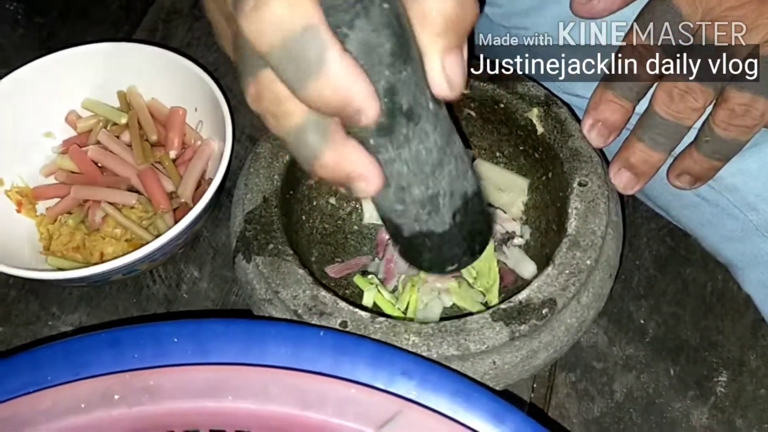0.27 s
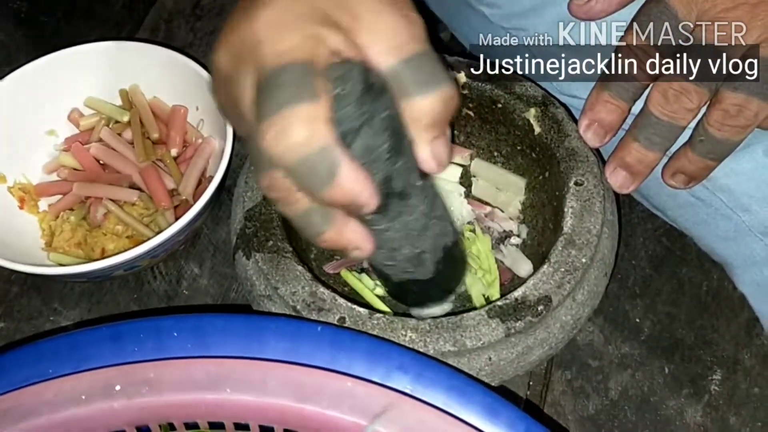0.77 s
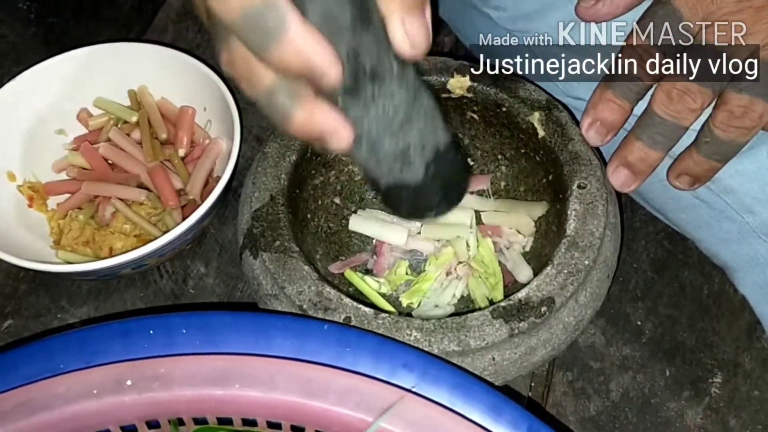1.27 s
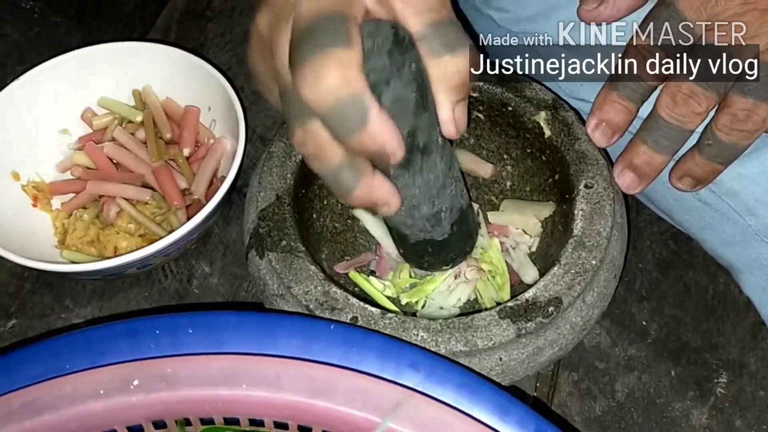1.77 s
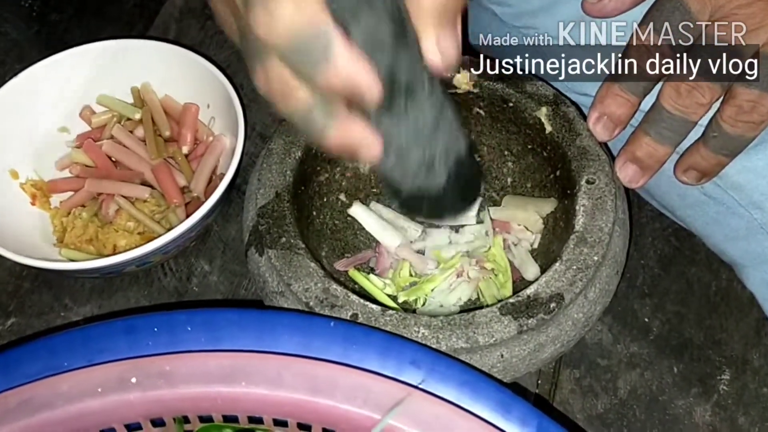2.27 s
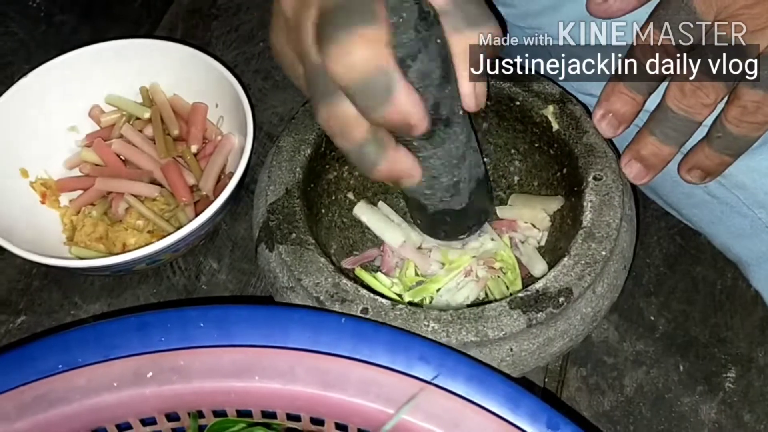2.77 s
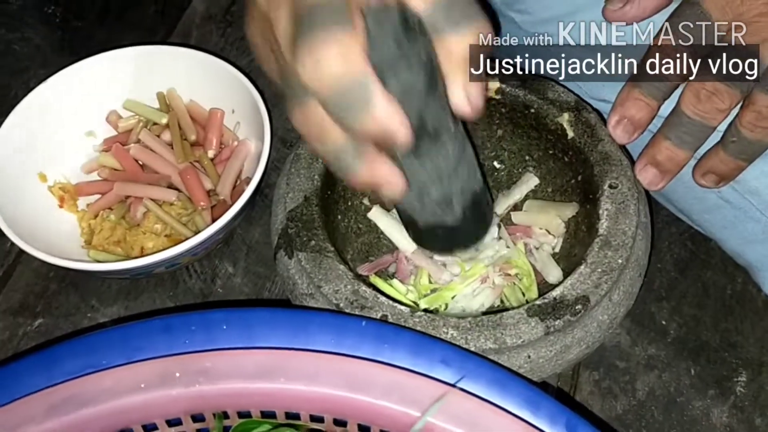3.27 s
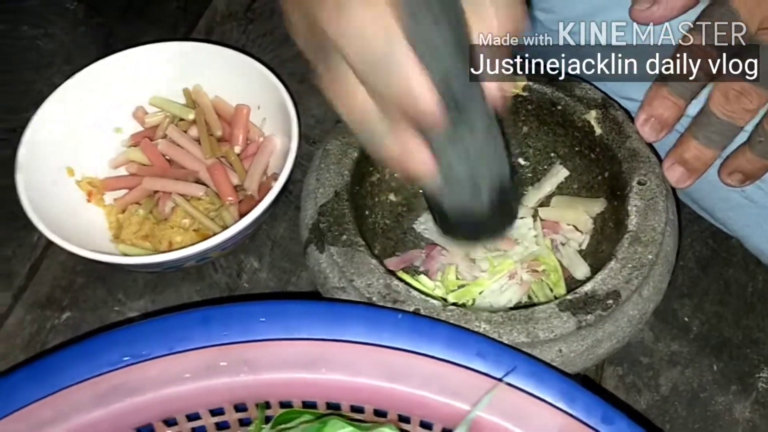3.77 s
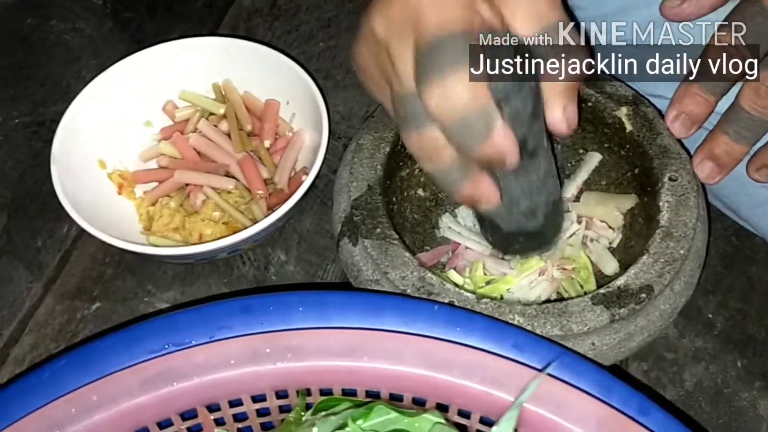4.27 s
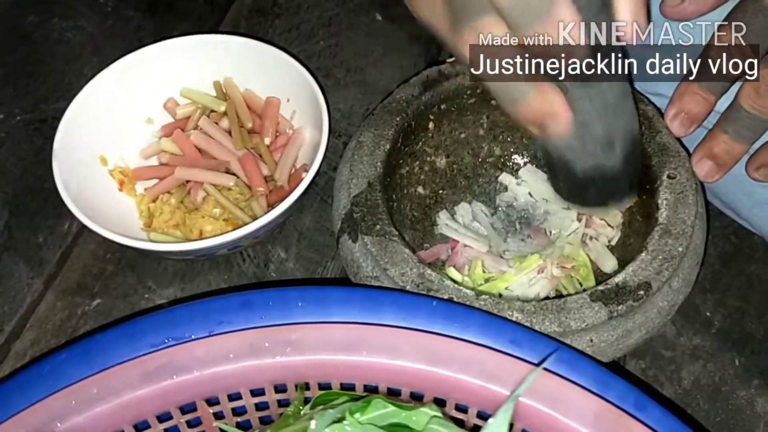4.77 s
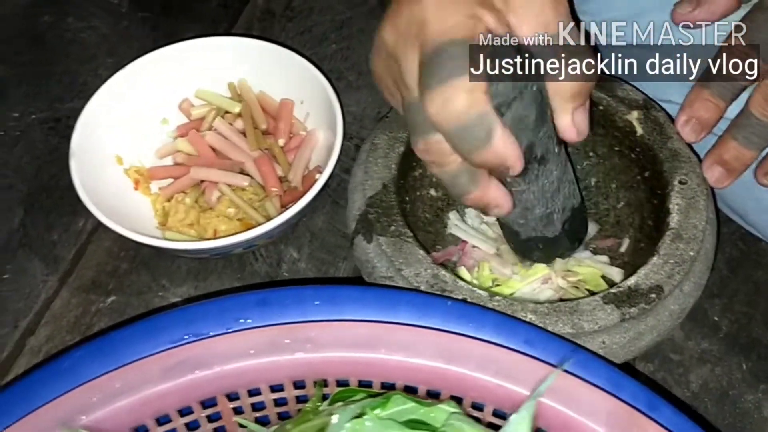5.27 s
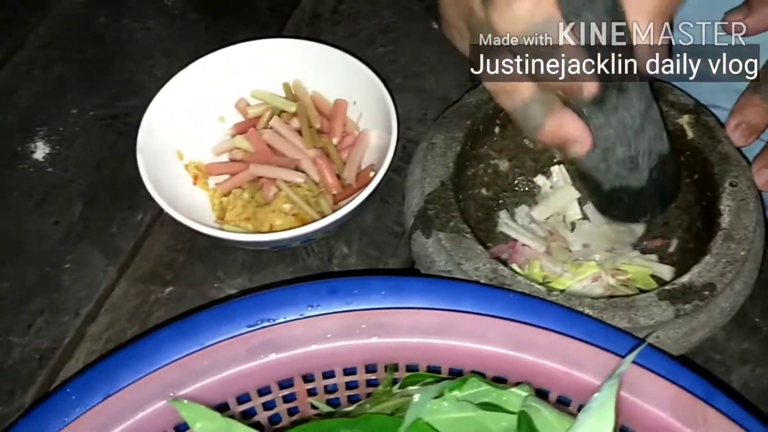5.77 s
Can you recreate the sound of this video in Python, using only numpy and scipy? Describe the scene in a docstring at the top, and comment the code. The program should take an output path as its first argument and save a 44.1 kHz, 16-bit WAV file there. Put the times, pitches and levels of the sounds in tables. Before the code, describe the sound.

Close, dry pounding in a small home kitchen: stone pestle on juicy stalks in a heavy mortar set on boards, steady and unhurried to the end. Crunchy bursts and low thuds vary in strength, with bright knocks where stone meets stone and two faint scrapes along the wall. Behind lies low room hiss with thin high insect trills. The microphone's automatic level pulls everything down briefly at most hits.

```python
"""Room hiss and faint insects, and at once a stone pestle pounding fresh stalks in a stone mortar.
About three blows a second: noise bursts crunch the stalks, damped board modes thump the wooden floor.
Some blows reach the stone and excite modes of bowl and pestle, a knock or a clink; small taps fall between.
Trills are narrow noise on a rising carrier; one faint tone swells late. The whole level dips around most blows."""
import sys
import numpy as np
from scipy import signal
from scipy.fft import rfft, irfft, next_fast_len
from scipy.io import wavfile
from scipy.ndimage import uniform_filter1d, map_coordinates

SR = 44100
rng = np.random.default_rng(int(sys.argv[2]) if len(sys.argv) > 2 else 0)


def bounce(signal):
    """Save signal as a 16-bit WAV file at the path given by the first command-line argument."""
    frames = np.transpose(np.atleast_2d(signal))
    limited = np.clip(frames, -1, 1)
    pcm = np.round(limited * 32767).astype(np.int16)
    wavfile.write(sys.argv[1], SR, pcm)


N = 265305

# background spectrum: (frequency [Hz], relative level [dB])
HISS_COLOUR = [(20, 3.5), (100, 1.5), (200, -7.5), (340, -13), (450, -11.5), (530, -5), (680, -8),
               (1000, -5), (2300, -7), (4200, -16), (6500, -22.5), (12000, -24.5), (15500, -20.5)]
# insect bands: (centre [Hz], half-width [Hz], level [dB])
CHORUS_BANDS = [(5276, 390, -61.5), (8220, 460, -62)]
# rising trills of the nearest insect: (start [s], end [s], level [dB])
INSECT_TRILLS = [(1.156, 1.642, -58.5), (3.909, 4.321, -60.5), (5.218, 5.851, -59)]
# pestle blows: (time [s], force [dB], crunch [dB], crunch brightness above 10 kHz [dB], whole-level dip [dB])
PESTLE_BLOWS = [(0.0533, -21, -18.5, 10.5, 5.5), (0.3828, -20.5, -22.5, 3, 3),
                (0.704, -25.5, -24, 7.5, 1.5), (1.0589, -25.5, -24.5, -10, 14.5),
                (1.4288, -25, -20, 5.5, 0), (1.769, -25, -10, 10, 8), (2.1047, -21, -16, 0.5, 11.5),
                (2.443, -24, -45, 10, 4), (2.8005, -24, -22.5, 4.5, 3), (3.137, -21, -20, -0.5, 5),
                (3.4778, -24, -21, 5, 1), (3.835, -22.5, -17, 1, 9), (4.1784, -19.5, -17, 1, 6),
                (4.5225, -20, -10, 1, 13.5), (4.844, -29.5, -32, -8, 0.5), (5.1989, -22, -22, 2, 3),
                (5.5353, -20, -21, 4.5, 0.5), (5.8674, -23, -16, 3, 7)]
# pestle scrapes down the mortar wall: (time [s], level [dB])
WALL_SCRAPES = [(2.463, -34.5), (4.8535, -30.5)]
# crushed-stalk spectrum: (frequency [Hz], relative level [dB])
CRUNCH_COLOUR = [(200, 17), (800, 5), (2500, 8), (5500, 3), (8000, 11), (10500, 3), (15000, 4.5),
                 (17000, 11)]
# floorboard modes: (frequency [Hz], relative level [dB], t60 [s])
BOARD_MODES = [(42, -1, 0.12), (68, 3, 0.054), (124.4, -1.5, 0.088), (185.9, -9.5, 0.19),
               (314.3, -14, 0.079), (391, -10.5, 0.1)]
# spectrum of the mortar landing on the boards: (frequency [Hz], relative level [dB])
CLUNK_COLOUR = [(40, -9), (150, 5.5), (300, 3), (500, 0.5), (850, -4.5), (1300, -10.5), (2000, -13),
                (4000, -77)]
# small taps of the hands between blows: (time [s], relative level [dB])
HAND_TAPS = [(0.325, -33), (3.079, -29.5), (3.386, -29.5), (3.721, -35), (5.735, -28), (5.971, -31)]
# tap spectrum: (frequency [Hz], relative level [dB])
TAP_COLOUR = [(100, -15), (550, 12.5), (1200, 3.5), (3000, -1.5), (8000, -20), (16000, -22)]
# pestle reaches the stone: (time [s], knock [dB], ring [dB], contact sharpness [Hz])
STONE_KNOCKS = [(0.3849, -10, -57, 670), (1.0577, 2.5, -7.5, 6200), (2.4426, -6, -14.5, 2700),
                (2.4535, -10.5, -39, 1730), (3.4803, -6.5, -42, 1040), (3.8364, 2, -60, 2230),
                (4.5223, 5, -41, 2400), (4.842, -12, -33.5, 1850), (5.5373, -11, -66, 750),
                (5.867, 0, -41, 2440)]
# modes of the mortar's hollow: (frequency [Hz], relative level [dB], t60 [s])
BOWL_MODES = [(299, -5.5, 0.016), (1007, 0, 0.0087), (1445, 3, 0.0059), (2230, 5, 0.0027),
              (3000, -10.5, 0.0084)]
# pestle modes: (frequency [Hz], relative level [dB], t60 [s])
PESTLE_MODES = [(1860, -25, 0.046), (2095, -7.5, 0.026), (2283, -14.5, 0.12), (3160, -17.5, 0.097),
                (3610, 1, 0.093), (3606, -13.5, 0.22), (3690, -7, 0.15), (3660, -15.5, 0.24),
                (4460, -31, 0.11), (8150, -25, .03), (9060, -20, 0.018)]
# faint background tone: (start [s], end [s], frequency [Hz], level [dB])
FAINT_TONE = (5, 5.5, 998, -61)
# spectrum of the walls' answer: (frequency [Hz], relative level [dB])
WALL_COLOUR = [(40, -11), (150, -5), (400, -5), (580, 2), (830, 3.5), (1300, -7), (2500, -7.5),
               (5000, -7.5), (15000, -13.5)]
# room decay: (frequency [Hz], t60 [s])
ROOM_DECAY = [(60, 0.46), (160, 0.32), (420, 0.15), (1100, 0.18), (3000, 0.17), (8000, 0.12), (15000, 0.2)]

TOP_HZ = 15750  # band limit
TRILL_FROM_HZ, TRILL_TO_HZ = 5490, 5630  # every trill rises alike
CRUSH_S, BREAK_S, SCRAPE_S = 0.0016, 0.00073, 0.0064  # half-lengths: cushioned, clean through, scrape
BARE_HZ = 1500  # sharper stone contacts have gone clean through the stalks
USUAL_FORCE_DB = -24  # reference force for push and hop
PUSH_S, PUSH_SHORTENS_DB_PER_DB = 0.0016, 0.63  # half-length of a usual push; shortening with force
SWAY_BUILD_S = 0.0029
FLIGHT_S, FLIGHT_GROWS_DB_PER_DB = 0.0175, 0.29  # mortar's hop after a usual blow; growth with force
REBOUND_DB, REBOUND_GROWS_DB_PER_DB = -23.5, 2.02  # relative landing level; growth with force
DIP_AHEAD_S, DIP_HOLD_S = 0.0087, 0.083  # dip starts before the blow, outlasts its main contact


def amp(db):
    """Amplitude factor of a level in dB."""
    return 10 ** (np.asarray(db) / 20)


def unit(x):
    """x at rms 1."""
    return x / np.sqrt(np.mean(x ** 2) + 1e-20)


def along(points, hz):
    """(Hz, value) points interpolated on a log-frequency axis."""
    f, v = np.transpose(points)
    return np.interp(np.log(hz + 1), np.log(f + 1), v)


def filtered(x, response):
    """x times a zero-phase response of frequency."""
    size = next_fast_len(len(x) + 8192)
    spectrum = rfft(x, size) * response(np.fft.rfftfreq(size, 1 / SR))
    return irfft(spectrum, size)[:len(x)]


def coloured(x, points):
    """x shaped by (Hz, dB) points."""
    return filtered(x, lambda hz: amp(along(points, hz)))


def pulse(points, size=2048):
    """Minimum-phase pulse with this spectrum, peak 1."""
    hz = np.fft.rfftfreq(size, 1 / SR)
    cepstrum = irfft(np.log(amp(along(points, hz))))
    # fold the cepstrum onto positive time: causal, energy earliest
    cepstrum[1:size // 2] *= 2
    cepstrum[size // 2 + 1:] = 0
    shape = irfft(np.exp(rfft(cepstrum)))
    return shape / np.abs(shape).max()


def wobble(rate_hz):
    """Smooth random curve, rate_hz knots a second."""
    knots = rng.standard_normal(int(N * rate_hz / SR) + 4)
    return map_coordinates(knots, [np.arange(N) * rate_hz / SR])


def add(track, start_s, sound):
    """Mix a sound into the track from start_s."""
    i = max(round(start_s * SR), 0)
    track[i:i + len(sound)] += sound[:max(len(track) - i, 0)]


def ring(modes, scatter_db, detune):
    """A third of a second of damped modes, level and pitch scattered at each call."""
    t = np.arange(SR // 3) / SR
    total = np.zeros(len(t))
    for hz, db, t60 in modes:
        envelope = amp(db + scatter_db * rng.normal() - 60 * t / t60)
        mode_hz = hz * (1 + detune * rng.normal())
        total += envelope * np.sin(2 * np.pi * mode_hz * t)
    return total


def in_room(sound, wet_db, gap_s=0.0029, build_s=0.002):
    """The sound plus the walls' answer: fresh decaying noise that builds up after a short gap."""
    hz, t, noise = signal.stft(rng.standard_normal(SR // 4), SR, nperseg=256)
    decay = amp(-60 * t / along(ROOM_DECAY, hz)[:, None])
    tail = signal.istft(noise * decay, SR, nperseg=256)[1]
    age = np.maximum(np.arange(len(tail)) / SR - gap_s, 0)
    tail = coloured(tail / np.linalg.norm(tail), WALL_COLOUR) * (1 - np.exp(-age / build_s))
    return sound + amp(wet_db) * signal.fftconvolve(sound, tail)[:len(sound)]


def hiss(level_db=-48.5, waver_db=-1.0):
    """Steady room background: coloured noise with a slight waver."""
    noise = unit(coloured(rng.standard_normal(N), HISS_COLOUR))
    return amp(level_db + waver_db * wobble(4.837)) * noise


def noise_band(centre_hz, width_hz):
    """Noise in a Gaussian band, rms 1."""
    noise = rng.standard_normal(N)
    return unit(filtered(noise, lambda hz: np.exp(-.5 * ((hz - centre_hz) / width_hz) ** 2)))


def insects(trill_width_hz=110):
    """Distant chorus in two wavering noise bands; a nearer insect's trills swell and rise."""
    t = np.arange(N) / SR
    out = np.zeros(N)
    for hz, width_hz, db in CHORUS_BANDS:
        out += amp(db + 0.83 * wobble(4.4)) * noise_band(hz, width_hz)
    for start, end, db in INSECT_TRILLS:
        progress = np.clip((t - start) / (end - start), 0, 1)
        pitch_hz = TRILL_FROM_HZ + (TRILL_TO_HZ - TRILL_FROM_HZ) * progress
        carrier = np.sin(2 * np.pi * np.cumsum(pitch_hz) / SR)
        trill = unit(carrier * noise_band(0, trill_width_hz))
        out += amp(db) * np.sin(np.pi * progress) * trill
    return out


def breaks_through(blow_s):
    """Whether the blow at blow_s ends in a sharp contact of bare stone."""
    return any(abs(at - blow_s) < .02 and sharp_hz > BARE_HZ for at, _, _, sharp_hz in STONE_KNOCKS)


def crushes(scrape_bright_db=1.0):
    """(s, half-length s, dB, brightness dB) of stalks giving way under blows and scrapes."""
    events = []
    for s, _, db, bright_db, _ in PESTLE_BLOWS:
        half_s = BREAK_S if breaks_through(s) else CRUSH_S
        events.append((s, half_s, db, bright_db))
    return events + [(s, SCRAPE_S, db, scrape_bright_db) for s, db in WALL_SCRAPES]


def crunch(lead_s=.03, touch_db=-14, touch_ahead_s=0.0049, squelch_db=-26, squelch_life_s=0.0072,
           grain_db=4, wet_db=3):
    """Plant cells burst in a dense crackle: first touch, the crush itself, wet squelch."""
    out = np.zeros(N)
    t = np.arange(SR // 4) / SR - lead_s
    for s, half_s, db, bright_db in crushes():
        crush = np.exp(-.5 * (t / half_s) ** 2)
        touch = amp(touch_db) * (t > -touch_ahead_s) * (t < 0)
        squelch = amp(squelch_db) * (t > 0) * np.exp(-np.abs(t) / squelch_life_s)
        # uneven grain levels make the noise crackle
        cells = rng.standard_normal(len(t)) * amp(grain_db * rng.standard_normal(len(t)))
        colour = [(hz, level + 0.5 * rng.normal() + bright_db * (hz > 10000))
                  for hz, level in CRUNCH_COLOUR]
        burst = unit(coloured(cells, colour)) * (crush + touch + squelch)
        add(out, s - lead_s, in_room(amp(db) * burst, wet_db))
    return out


def thump(push_db=1, push_lag_s=0.00099, sway_db=-1.5, wet_db=1):
    """The cushioned blow pushes the mortar down; the boards swing back and sway in damped modes."""
    lead_s = .01
    out = np.zeros(N)
    t = np.arange(SR // 3) / SR - lead_s
    for s, db, *_ in PESTLE_BLOWS:
        # a harder push is shorter
        half_s = PUSH_S * amp(-PUSH_SHORTENS_DB_PER_DB * (db - USUAL_FORCE_DB))
        body = -amp(push_db) * np.exp(-.5 * ((t - push_lag_s) / half_s) ** 2)
        build = 1 - np.exp(-(t + lead_s) / SWAY_BUILD_S)
        sway = amp(sway_db) * build * ring(BOARD_MODES, scatter_db=2.5, detune=0.028)
        add(body, lead_s + push_lag_s, sway)
        add(out, s - lead_s, in_room(amp(db) * body, wet_db))
    return out


def flight_s(force_db):
    """Seconds until the mortar lands again: a harder blow makes it hop longer."""
    return FLIGHT_S * amp(FLIGHT_GROWS_DB_PER_DB * (force_db - USUAL_FORCE_DB))


def rebounds():
    """(s, relative dB) of the mortar rocking back onto the boards after each blow."""
    return [(s + flight_s(force_db), REBOUND_DB + REBOUND_GROWS_DB_PER_DB * (force_db - USUAL_FORCE_DB))
            for s, force_db, *_ in PESTLE_BLOWS]


def dead_knocks(events, colour, gain_db, wet_db):
    """Short dead contacts, one coloured pulse each, that the room fills out."""
    out = np.zeros(N)
    shape = np.pad(pulse(colour), (0, SR // 5))
    for s, db in events:
        add(out, s, in_room(amp(db + gain_db) * shape, wet_db))
    return out


def stone(knock_wet_db=-1, ring_wet_db=-2):
    """Stone meets stone: paste between dulls the knock, bare contact sets the pestle ringing."""
    out = np.zeros(N)
    for s, hit_db, clink_db, sharp_hz in STONE_KNOCKS:
        # neighbouring bowl modes swing in opposite directions
        hollow = sum((-1) ** k * ring([mode], scatter_db=0.5, detune=0.033)
                     for k, mode in enumerate(BOWL_MODES))
        # a shorter contact reaches higher and carries less bass
        knock = signal.lfilter(*signal.butter(2, min(sharp_hz, SR / 3), fs=SR), hollow)
        knock = signal.lfilter(*signal.butter(1, sharp_hz / 4, "high", fs=SR), knock)
        add(out, s, in_room(amp(hit_db) * knock / np.abs(knock).max(), knock_wet_db))
        clink = -amp(clink_db) * ring(PESTLE_MODES, scatter_db=0, detune=0.00023)
        add(out, s, in_room(clink, ring_wet_db))
    return out


def faint_tone():
    """A thin, distant sine swells and fades once."""
    start, end, hz, db = FAINT_TONE
    t = np.arange(N) / SR
    progress = np.clip((t - start) / (end - start), 0, 1)
    swell = np.abs(np.sin(np.pi * progress)) ** .5
    return amp(db) * swell * np.sin(2 * np.pi * hz * t)


def dips():
    """Gain that drops before a blow and returns a fixed time after bare contact or the mortar's landing."""
    t = np.arange(N) / SR
    db = np.zeros(N)
    for s, force_db, _, _, depth_db in PESTLE_BLOWS:
        contact_s = s if breaks_through(s) else s + flight_s(force_db)
        db -= max(depth_db, 0) * (t > s - DIP_AHEAD_S) * (t < contact_s + DIP_HOLD_S)
    return amp(uniform_filter1d(db, size=88))  # 2 ms edges


def scene():
    """Background, pounding, small taps and tone, in one channel."""
    background = hiss() + insects()
    landings = dead_knocks(rebounds(), CLUNK_COLOUR, gain_db=1.5, wet_db=3)
    pounding = crunch() + thump() + landings
    taps = dead_knocks(HAND_TAPS, TAP_COLOUR, gain_db=-0.5, wet_db=1)
    return (background + pounding + taps + stone() + faint_tone())[None]


def record(dry, low_cut_hz=36):
    """The microphone loses the deepest bass; then the level dips and the band limit."""
    heard = signal.lfilter(*signal.butter(2, low_cut_hz, "high", fs=SR), dry[0])
    return filtered(heard * dips(), lambda hz: hz < TOP_HZ)[None]


dry = scene()
out = record(dry)
bounce(out)
```